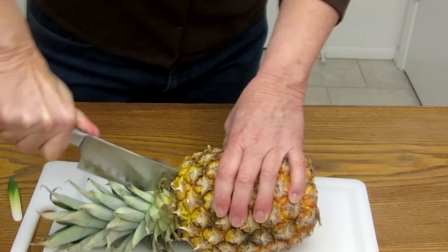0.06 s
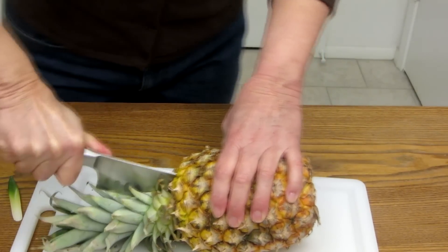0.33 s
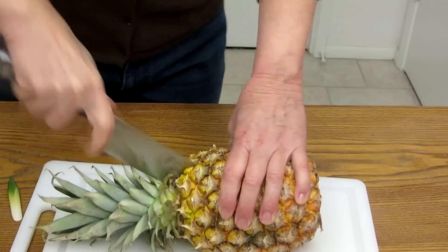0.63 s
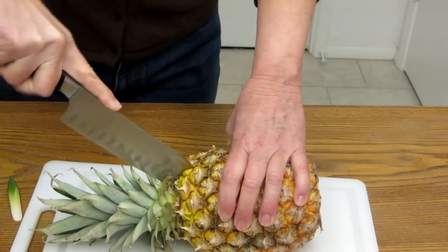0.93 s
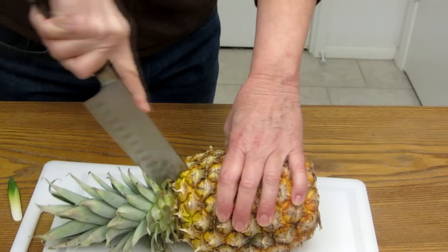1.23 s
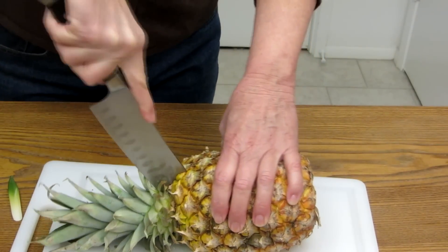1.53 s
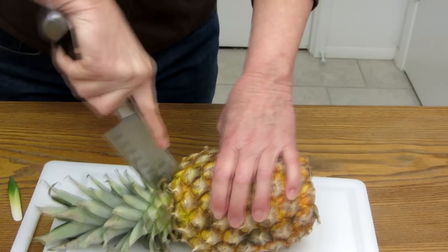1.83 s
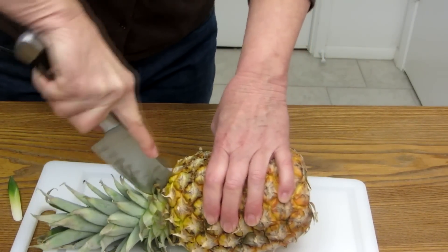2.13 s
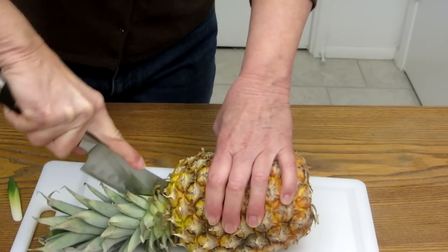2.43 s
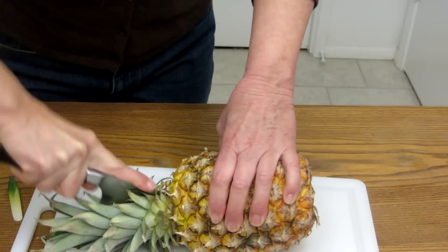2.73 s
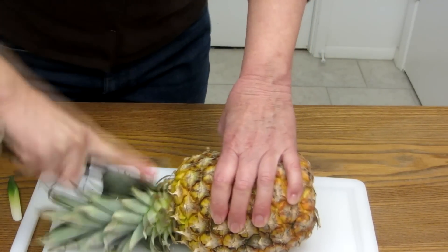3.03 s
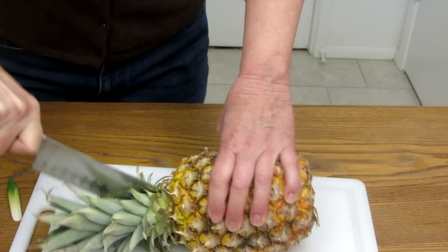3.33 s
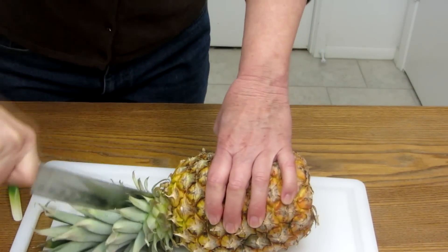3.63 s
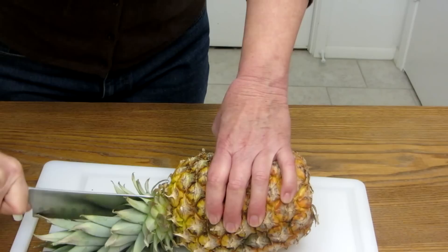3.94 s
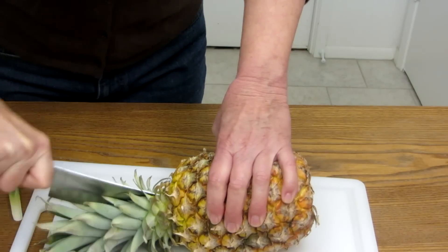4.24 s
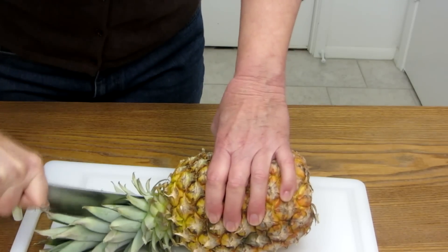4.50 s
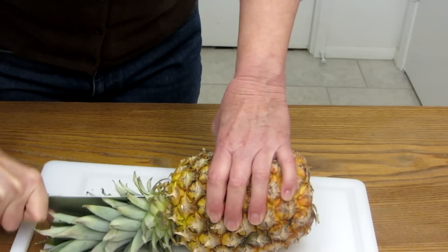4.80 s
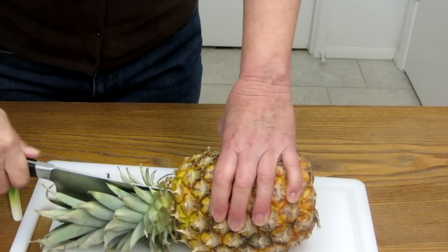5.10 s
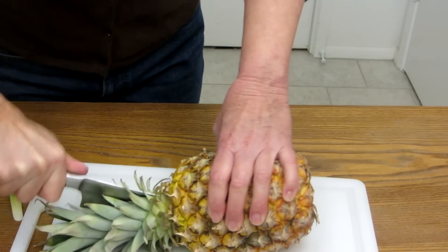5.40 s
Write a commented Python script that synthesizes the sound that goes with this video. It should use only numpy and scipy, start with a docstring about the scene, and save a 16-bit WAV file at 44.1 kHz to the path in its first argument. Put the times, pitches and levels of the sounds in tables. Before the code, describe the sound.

Stiff pineapple leaves snap and crunch in uneven bursts under a kitchen knife, close up, as the fruit bumps the cutting board.

```python
"""A hard-walled kitchen, a stereo pair close to a plastic board: a large knife cuts a pineapple's crown.
Stiff leaves snap at once over a wet crackle of bursting cells, then the cut eases and the blade swishes
along a leaf. Near two seconds it rasps in the rind and the fruit knocks on the board. Two runs of loud
snaps follow, before three seconds and from four to five, then lighter cutting to the end.
The room answers every snap, over the steady air of the house."""
import sys
import numpy as np
from scipy import signal
from scipy.fft import rfft, irfft
from scipy.io import wavfile

SR = 44100
rng = np.random.default_rng(int(sys.argv[2]) if len(sys.argv) > 2 else 0)


def generate_wav(signal):
    """Clip the signal to [-1, 1] and save it as 16-bit WAV at the path in sys.argv[1]."""
    frames = np.transpose(np.atleast_2d(signal))
    scaled = np.clip(frames, -1, 1) * 32767
    pcm = np.round(scaled).astype(np.int16)
    wavfile.write(sys.argv[1], SR, pcm)


N = 245195

# Levels are relative, ahead of the mix gains; spectra give level per hertz.
# air of the still room: freq_hz, level_db
AIR_SPECTRUM = [(20, -11), (50, -21), (100, -14), (300, -8), (900, -5.5), (1500, -14), (4000, -17),
                (8000, -28), (16000, -29.5)]
# pushes of the knife through the crown: deepest_bite_s, level_db, build_s, tilt_db_per_octave
KNIFE_STROKES = [(.01, -44, 0.067, -0.5), (.14, -43.5, 0.055, -2.5), (.24, -40.5, .03, -1.5),
                 (0.357, -29.5, 0.042, 3.5), (.594, -38.5, 0.027, -.5), (.86, -50.5, 0.29, 8),
                 (1.09, -51.5, 0.023, 4), (1.345, -46.5, 0.017, -1.5), (1.48, -50, 0.032, -1.5),
                 (1.65, -50, 0.096, 4), (1.889, -28.5, .012, -1.5), (2.335, -35.5, 0.022, 0.5),
                 (2.598, -36, 0.032, 4), (2.697, -27, 0.01, 4), (2.775, -28, 0.046, 6),
                 (2.81, -30.5, 0.014, 3), (2.96, -45.5, .06, 4), (3.11, -38, 0.013, 2.5),
                 (3.358, -42.5, 0.11, 4), (3.502, -45, 0.018, -.5), (3.61, -45, 0.015, 5.5),
                 (3.73, -46, 0.12, -4.5), (3.845, -37.5, 0.074, 3.5), (3.96, -38.5, .04, .5),
                 (4.06, -37, .04, -1), (4.126, -30.5, 0.013, -2), (4.31, -37, 0.046, 0.5),
                 (4.69, -41, .09, 3.5), (4.8, -37.5, 0.11, -1), (4.865, -36.5, 0.053, 2),
                 (5.004, -37.5, 0.05, .5), (5.401, -39.5, 0.061, 4), (5.54, -39.5, 0.15, 0.5)]
STROKE_RELEASE_DB_PER_S = 142  # the crackle dies away once the hand eases
REST_DB, REST_TILT_DB_PER_OCTAVE = -61, -0.45  # leaves stirring against the resting blade
# bursting cell walls: freq_hz, level_db
CRACKLE_SPECTRUM = [(150, -51.5), (350, -2.5), (800, -2), (1500, 0), (2700, -0.5), (5000, 0), (8000, -5.5),
                    (11000, -9), (16000, -16)]
# board and table under the cut: freq_hz, level_db
RUMBLE_SPECTRUM = [(15, -16), (45, 5.5), (110, 1.5), (190, -1), (380, -2.5), (900, -15.5), (4000, -65)]
# larger leaves and fibres breaking: start_s, peak_db, pitch_hz, tear_re_peak_db
LEAF_SNAPS = [(0.1069, -25.5, 5800, -4.5), (0.1151, -9.5, 7900, -12), (0.3107, -6, 6870, -17.5),
              (0.353, -14.5, 6740, -13.5), (0.4795, -23.5, 6100, -11.5), (0.582, -28, 3180, -17),
              (1.0784, -34, 5000, -12), (1.191, -35.5, 4530, -14), (1.376, -34.5, 3020, -8.5),
              (1.466, -34, 4280, -5), (1.5184, -31.5, 5800, -16), (1.878, -13.5, 8050, -17),
              (2.1167, -34, 6040, -16), (2.1714, -34, 7640, -6), (2.3974, -26, 3640, -22),
              (2.531, -27.5, 6700, -10), (2.5901, -17, 6500, -11.5), (2.6794, -7.5, 6100, -8.5),
              (2.7884, -9.5, 5240, -8.5), (2.8433, -5.5, 3430, -15), (3.089, -21, 2930, -12),
              (3.5756, -25.5, 5500, -18), (3.708, -24, 7100, -11.5), (3.9324, -12.5, 3580, -12),
              (4.0132, -13, 7650, -18), (4.0434, -14, 2670, -15), (4.109, -12, 3870, -5),
              (4.559, -28.5, 5400, -9), (4.584, -24, 3260, -11), (4.6554, -20, 4700, -19),
              (4.8298, -12, 4000, -10.5), (4.854, -11, 4740, -10.5), (4.9749, -21, 3530, -10),
              (5.2294, -31.5, 5500, -4), (5.5008, -23, 4800, -3.5)]
# small leaves radiate little bass: freq_hz, gain_db
SNAP_SPECTRUM = [(150, -16), (500, -2), (1000, 2), (2200, -1.5), (7500, 1), (11000, -1), (16000, -8)]
TICKS_PER_S, TICK_HZ, TICK_SPREAD_OCTAVES = 5, 5170, 0.39  # thin fibres giving way
TICK_OVER_CUT_DB, TICK_TEAR_DB = 10, -21.5
# the board on the table: pitch_hz, level_db, t60_s
BOARD_MODES = [(46, -14.5, 0.42), (151, -4.5, 0.11), (187, 0.5, 0.12), (322, -11, 0.25), (357, -4.5, 0.33),
               (714, -17, 0.17), (1440, -16, 0.13)]
# the fruit rocking on the board: start_s, peak_db, push_s
FRUIT_BUMPS = [(0.141, -44.5, 0.0023), (0.309, -44.5, 0.0016), (1.101, -36, 0.0033), (1.456, -39.5, .004),
               (1.624, -41, 0.0026), (1.929, -13.5, 0.0014), (1.96, -29, 0.0032), (2.236, -40.5, 0.0021),
               (2.333, -28, 0.00078), (2.428, -25.5, 0.0017), (2.662, -39, 0.01), (4.11, -35, 0.0096),
               (5.419, -37.5, 0.0018), (5.5, -39, 0.0055)]
# the flat of the blade sliding along a leaf: start_s, level_db, length_s, pitch_hz
LEAF_SWISHES = [(0.22, -41.5, 0.03, 2150), (0.575, -43.5, 0.032, 2360), (.865, -39, 0.085, 4320),
                (1.348, -50.5, 0.13, 2160), (1.88, -33, 0.013, 2380), (2.198, -42.5, 0.04, 2180),
                (3.087, -38.5, 0.036, 2530), (3.486, -45, 0.021, 2370), (4.64, -44.5, 0.079, 3000)]
# the steel, damped by the fruit: pitch_hz, width_hz, level_db
BLADE_MODES = [(3770, 76, -5), (4930, 71, -2), (5680, 54, 5)]
# the blade dragging in the rind: hardest_pull_s, level_db, build_s
RIND_DRAGS = [(1.885, -37, 0.0086), (1.937, -32, 0.02), (2.342, -35, 0.025), (2.435, -43, 0.054),
              (2.6, -48, .06), (2.81, -52, 0.11), (4.125, -44.5, .012)]
DRAG_RELEASE_DB_PER_S = 139
# rasp of the rind, pressed against the board: freq_hz, level_db
RASP_SPECTRUM = [(15, -33), (45, 8.5), (90, -14), (190, 5.5), (350, 1), (500, -2.5), (740, 2.5), (1400, -5),
                 (2400, -7), (4000, -14), (9000, -30)]
# balance of the direct sound at the microphones: freq_hz, right_minus_left_db
MIC_BALANCE = [(200, -2), (1000, -1), (5500, 0.5), (8000, 1), (11000, 4.5)]
# reflections off table top, body and cupboards: delay_s, level_db
NEAR_ECHOES = [(.0024, -20), (.0052, -18.5), (.0061, -49), (.0072, -19), (.0094, -24)]
# decay of the kitchen: freq_hz, t60_s
ROOM_DECAY = [(100, 1), (500, 0.69), (1400, 1), (3700, 0.59), (9700, 0.44), (16000, 0.36)]
# the diffuse field at the microphones: freq_hz, left_right_correlation
MIC_CORRELATION = [(130, -0.99), (250, -0.85), (500, -0.9), (1000, -0.62), (2200, 0.18), (4500, 0.33),
                   (8000, 0.19), (13000, -0.55)]


def amp(db):
    """Decibels to gain."""
    return np.exp(np.asarray(db) * (np.log(10) / 20))


def unit_rms(x):
    """Scales to an rms of one."""
    return x / np.sqrt(np.mean(x ** 2) + 1e-20)


def curve_at(points, hz):
    """Reads a table on a log-frequency axis."""
    freq_hz, value = np.transpose(points)
    return np.interp(np.log(hz + 1), np.log(freq_hz + 1), value)


def add(mix, start_s, sound):
    """Adds a sound into the mix at start_s."""
    part = mix[max(round(start_s * SR), 0):][:len(sound)]
    part += sound[:len(part)]


def colour(x, spectrum, size=2048):
    """Minimum-phase filter with the given spectrum."""
    hz = abs(np.fft.fftfreq(size, 1 / SR))
    log_gain = np.log(amp(curve_at(spectrum, hz)))
    taps = np.fft.ifft(np.exp(np.conj(signal.hilbert(log_gain)))).real
    return signal.oaconvolve(x, taps[:size // 2])[:N]


def ring(x, hz, q):
    """One damped resonance."""
    return signal.lfilter(*signal.iirpeak(min(hz, SR / 2.5), max(q, 1), fs=SR), x)


def clicks(per_s, spread_db, size):
    """Random clicks of either sign, most of them small and a few large."""
    out, chance = np.zeros(size), rng.random(size) * (SR / per_s)
    at = np.flatnonzero(chance < 1)
    out[at] = (-1) ** at * amp(spread_db * np.minimum(-np.log(chance[at]), 4))
    return out


def diffuse_pair(a, b):
    """Makes two unrelated signals as alike as a diffuse field is at the two microphones."""
    correlation = np.clip(curve_at(MIC_CORRELATION, np.fft.rfftfreq(len(a), 1 / SR)), -1, 1)
    mid = rfft(a) * np.sqrt((1 + correlation) / 2)
    side = rfft(b) * np.sqrt((1 - correlation) / 2)
    return irfft(np.array([mid + side, mid - side]), len(a))


def house_air():
    """Room tone: the steady air noise of the house."""
    noises = [colour(rng.standard_normal(N), AIR_SPECTRUM) for mic in range(2)]
    return amp(-48) * unit_rms(diffuse_pair(*noises))


def hand_push(peak_s, level_db, build_s, release_db_per_s):
    """Gain of one push of the hand: it builds up to peak_s, then lets go at a steady rate."""
    t = np.arange(N) / SR - peak_s
    return amp(level_db - release_db_per_s * np.maximum(t, 0)) * np.exp(np.minimum(t, 0) / build_s)


def knife_strokes():
    """Level (dB) and tilt (dB per octave) of the cut: strokes add in power, and the tilt is their power-
    weighted mean, the resting blade included."""
    power = np.full(N, amp(REST_DB) ** 2)
    weighted_tilt = REST_TILT_DB_PER_OCTAVE * power
    for bite_s, level_db, build_s, tilt in KNIFE_STROKES:
        stroke = hand_push(bite_s, level_db, build_s, STROKE_RELEASE_DB_PER_S) ** 2
        power += stroke
        weighted_tilt += tilt * stroke
    return 10 * np.log10(power), weighted_tilt / power


def cell_crackle(cut_db, cut_tilt, per_s=420, spread_db=3.5):
    """Cell walls burst under the edge: tiny clicks, each ringing at the pitch of its own fibre."""
    bundle = clicks(per_s, spread_db, N)  # a break across a whole bundle sounds at every pitch
    out, power = np.zeros(N), np.zeros(N)
    for hz in np.geomspace(500, 14000, 14):
        gain = amp(cut_tilt * np.log2(np.clip(hz, 1500, 9000) / 4500))
        bursts = clicks(per_s, spread_db, N) + 0.33 * np.roll(bundle, rng.integers(20))
        out += np.sqrt(hz) * gain * unit_rms(ring(bursts, hz, q=1.95))
        power += hz * (gain * amp(curve_at(CRACKLE_SPECTRUM, hz))) ** 2
    out /= np.sqrt(power)  # the tilt moves the colour and leaves the level
    return amp(cut_db - 1) * unit_rms(colour(out, CRACKLE_SPECTRUM))


def table_rumble(cut_db):
    """The force of the cut shakes the board and the table, the more the harder it bites."""
    jolts = clicks(per_s=500, spread_db=2.4, size=N)
    return amp(-38 + 0.5 * cut_db) * unit_rms(colour(jolts, RUMBLE_SPECTRUM))


def fibre_snap(peak_db, hz, tear_db, split_s=0.00064, tear_s=0.035, core_hz=1400):
    """A fibre gives way and rings its leaf and the fruit's core; its neighbours tear after it."""
    t = np.arange(SR // 8) / SR
    crack = 0.44 * rng.standard_normal(len(t)) * np.exp(-t / split_s)
    crack[0] = 1
    tearing = unit_rms(clicks(per_s=4000, spread_db=1.55, size=len(t))) * np.exp(-t / tear_s)
    core_gain = amp(-9) * 2 * core_hz / hz  # thick, low-pitched fibres shake the core most
    out = np.zeros(len(t))
    for force, level_db in ((crack, peak_db), (tearing, peak_db + tear_db)):
        leaf = ring(force, hz, q=1) + amp(-3) * ring(force, hz, q=2.1)
        sound = leaf - core_gain * ring(force, core_hz, q=1)
        out += amp(level_db) * sound / abs(sound).max()
    return out


def leaf_snaps(cut_db):
    """The large breaks, and thin fibres ticking at random, louder the harder the knife bites."""
    out = np.zeros(N)
    for start_s, peak_db, hz, tear_db in LEAF_SNAPS:
        add(out, start_s, fibre_snap(peak_db, hz, tear_db))
    for at in np.flatnonzero(rng.random(N) < TICKS_PER_S / SR):
        hz = TICK_HZ * 2 ** (TICK_SPREAD_OCTAVES * rng.uniform(-1.2, 1))
        add(out, at / SR, fibre_snap(cut_db[at] + TICK_OVER_CUT_DB, hz, TICK_TEAR_DB))
    return amp(0.5) * colour(out, SNAP_SPECTRUM)


def board_ring(force):
    """The modes of the cutting board, driven by a force."""
    t = np.arange(SR // 2) / SR
    modes = sum(amp(db) * np.exp(-np.log(1000) * t / t60_s) * np.cos(2 * np.pi * hz * t)
                for hz, db, t60_s in BOARD_MODES)
    return signal.fftconvolve(force, modes)[:len(force)]


def fruit_bumps():
    """The fruit rocks, and each soft push rings the board."""
    out, t = np.zeros(N), np.arange(SR // 2) / SR
    for start_s, peak_db, push_s in FRUIT_BUMPS:
        progress = 4 * t / push_s
        thud = board_ring(progress * np.exp(-progress))
        add(out, start_s, amp(peak_db) * thud / abs(thud).max())
    return amp(-5.5) * out


def leaf_swishes():
    """Fine, dense friction of steel on a waxy leaf: it catches quickly and lets go slowly."""
    out, t = np.zeros(N), np.arange(SR // 4) / SR
    for start_s, level_db, length_s, hz in LEAF_SWISHES:
        slips = clicks(per_s=5000, spread_db=1.4, size=len(t))
        for _ in range(3):
            slips = ring(slips, hz, q=1.44)
        progress = 3 * t / length_s
        swell = (progress * np.exp(1 - progress)) ** 2
        add(out, start_s, amp(level_db) * unit_rms(slips) * swell)
    return out


def blade_ring(friction):
    """Friction on the flat of the knife, with the ring it draws from the steel."""
    steel = sum(amp(db) * ring(friction, hz, q=hz / width_hz) for hz, width_hz, db in BLADE_MODES)
    return friction + amp(3) * steel


def rind_rasp():
    """The blade sticks and slips in the rind, and shakes the board through the fruit."""
    slips = clicks(per_s=1400, spread_db=2.9, size=N)
    pull_power = sum(hand_push(*drag, DRAG_RELEASE_DB_PER_S) ** 2 for drag in RIND_DRAGS)
    rind = unit_rms(colour(slips, RASP_SPECTRUM))
    board = amp(-11) * unit_rms(board_ring(slips))
    return amp(1.5) * np.sqrt(pull_power) * (rind + board)


def close_mics(x):
    """The straight path to the two microphones, and a few near reflections."""
    out = np.array([colour(x, [(hz, side * db / 2) for hz, db in MIC_BALANCE]) for side in (-1, 1)])
    for delay_s, level_db in NEAR_ECHOES:
        for mic in out:
            add(mic, delay_s + rng.uniform(0, 2 / SR), amp(level_db) * x)
    return out


def kitchen_tail(x, rise_s=0.0032, early_s=0.017, tails=3):
    """The diffuse tail of the kitchen, each band dying at its own speed."""
    out, t = np.zeros((2, N)), np.arange(SR // 2) / SR
    onset = (1 - np.exp(-(t / rise_s) ** 2)) * (1 + 2.5 * np.exp(-t / early_s))
    for k in range(tails):  # the place of the break keeps moving, so the tails crossfade
        hz, frame_s, noise = signal.stft(rng.standard_normal((2, len(t))), SR, nperseg=256)
        decay = np.exp(-np.log(1000) * frame_s / curve_at(ROOM_DECAY, hz)[:, None])
        _, tail = signal.istft(noise * decay, SR, nperseg=256)
        tail = diffuse_pair(*(tail[:, :len(t)] * onset))
        tail /= np.linalg.norm(tail[0])
        share = np.sqrt(2 / tails) * np.cos(np.pi * (13 * np.arange(N) / SR + k / tails))
        out += signal.oaconvolve((x * share)[None], tail, axes=1)[:, :N]
    return out


def scene():
    """Snaps, crackle and the dull sounds of the board, close up, each with its own share of the room."""
    cut_db, cut_tilt = knife_strokes()
    snaps = amp(2) * leaf_snaps(cut_db)
    rustle = amp(-1.5) * (cell_crackle(cut_db, cut_tilt) + blade_ring(leaf_swishes()))
    drag = amp(-3) * (rind_rasp() + table_rumble(cut_db))
    bumps = fruit_bumps()
    room_send = amp(-1.73) * snaps + amp(0.77) * rustle + amp(-3) * drag + amp(-7) * bumps
    return close_mics(snaps + rustle + drag + bumps) + kitchen_tail(room_send) + house_air()


def record(dry):
    """The recorder's band limit."""
    lowpass = signal.firwin(511, cutoff=16200, window=("kaiser", 9), fs=SR)
    return signal.oaconvolve(dry, lowpass[None], "same")


dry = scene()
out = record(dry)
generate_wav(out)
```